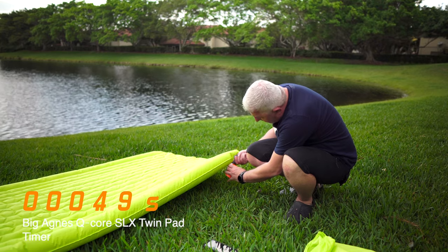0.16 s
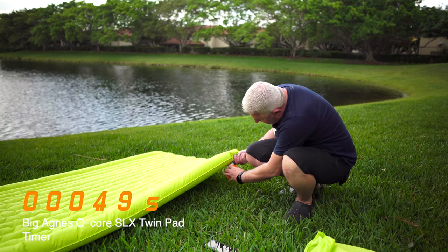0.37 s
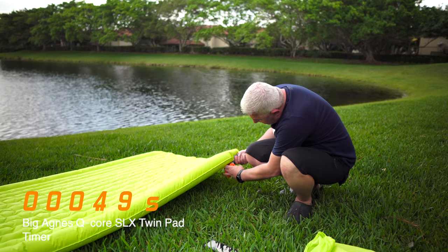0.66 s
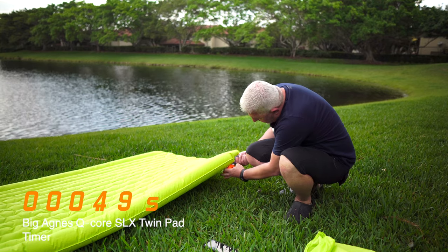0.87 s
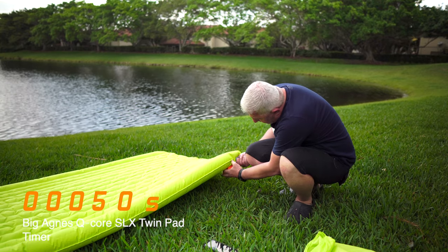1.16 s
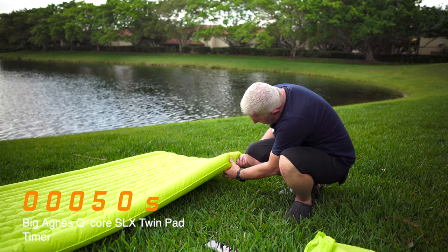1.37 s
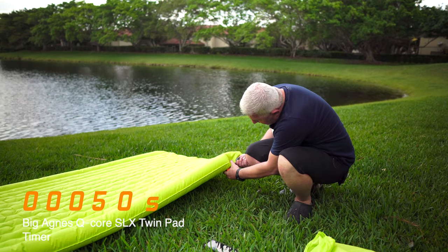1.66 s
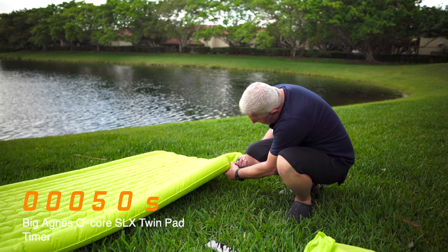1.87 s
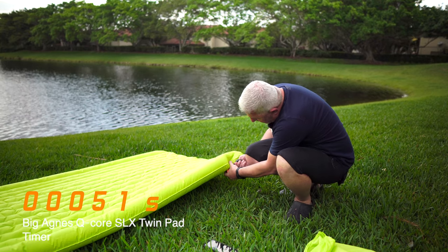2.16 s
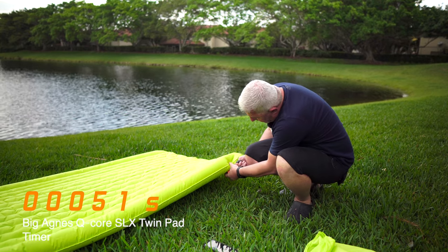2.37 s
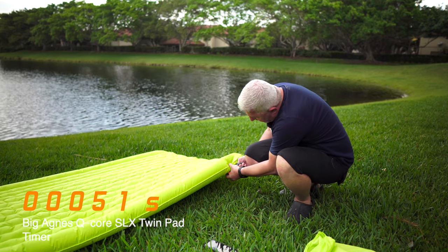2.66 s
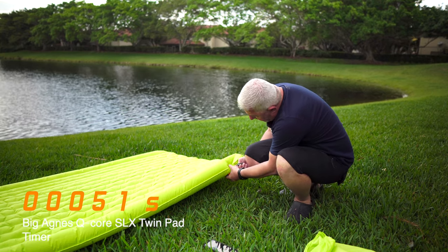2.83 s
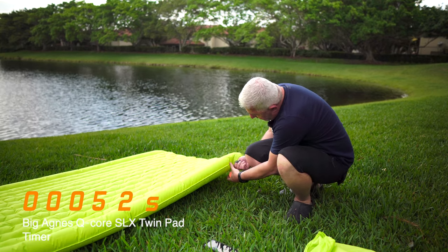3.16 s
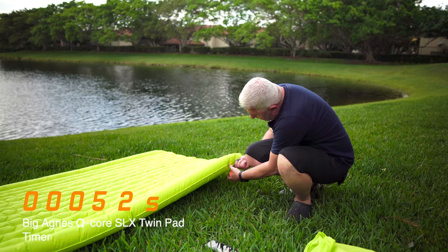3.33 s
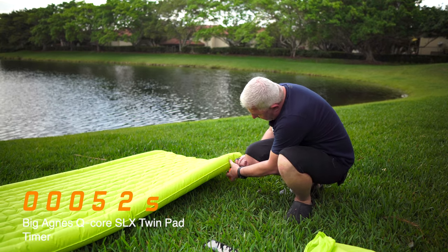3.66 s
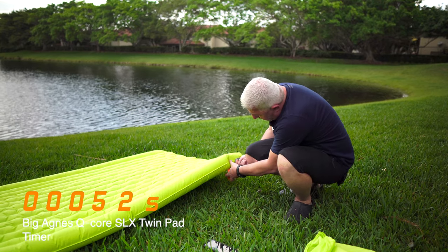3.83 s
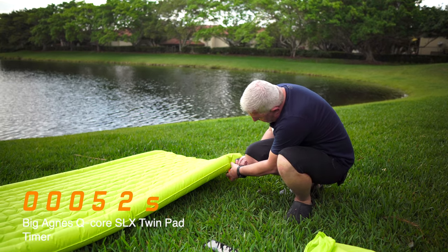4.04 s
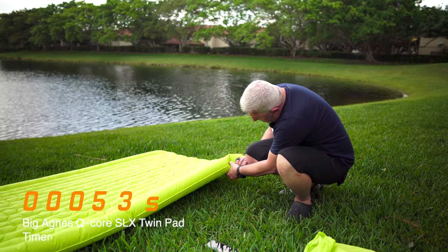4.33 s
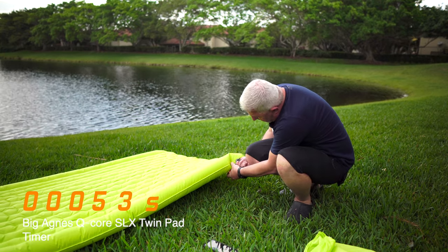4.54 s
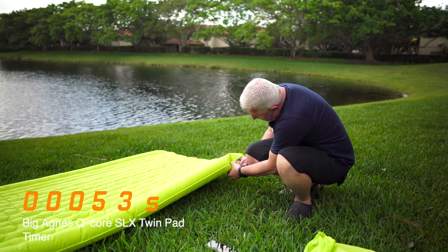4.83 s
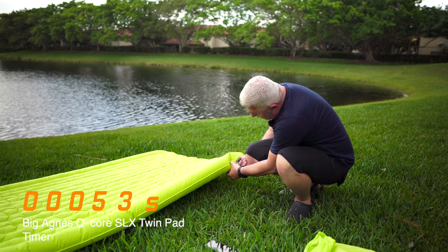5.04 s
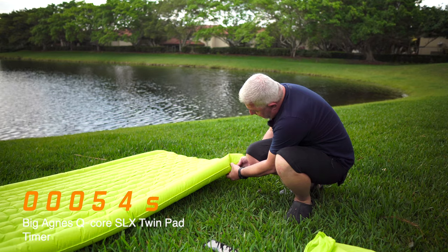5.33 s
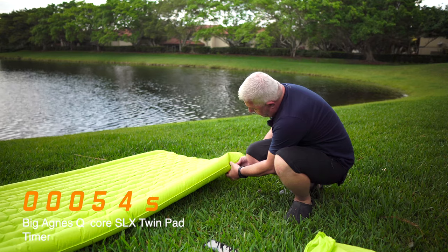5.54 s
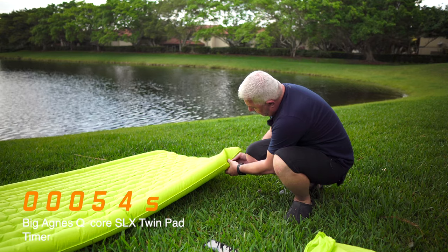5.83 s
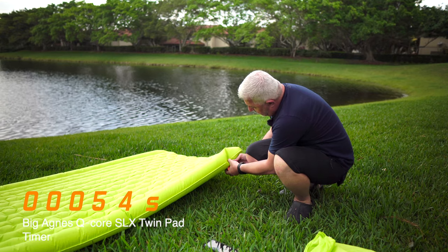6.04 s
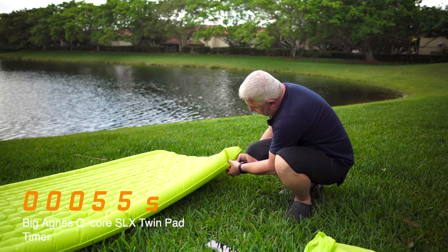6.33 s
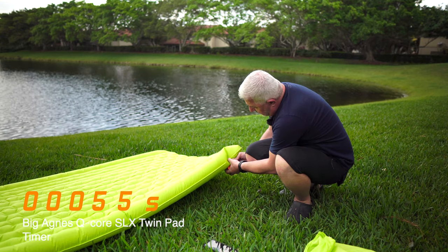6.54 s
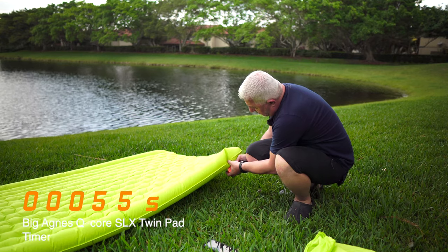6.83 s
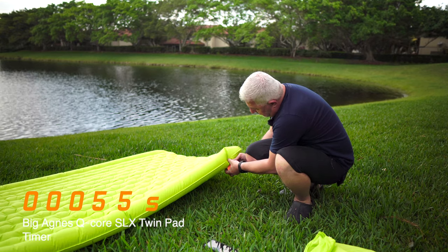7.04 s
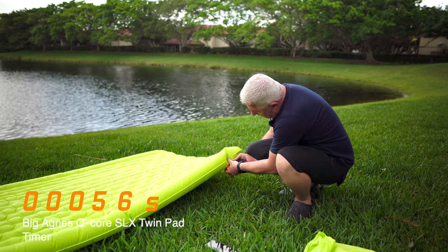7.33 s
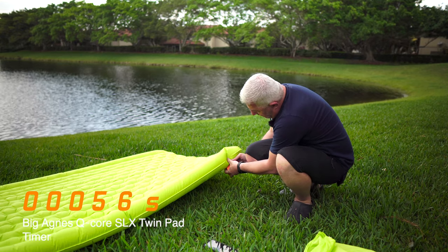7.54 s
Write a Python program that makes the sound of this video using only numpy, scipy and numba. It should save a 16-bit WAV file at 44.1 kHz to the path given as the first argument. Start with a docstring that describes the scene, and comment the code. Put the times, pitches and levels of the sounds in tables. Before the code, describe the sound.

A small battery air pump whines without pause, close to the microphone, on a lawn. From 0 to 1 s the whine sits near 2.95 kHz, bright and unsteady, with strong air roar and hiss. Around 1 s it rises to about 3.1 kHz and the roar steadies. At 2.03 s a blunt valve pop and tick land and the air thins; a stronger pop hits at 2.88 s as the pitch briefly jumps. From 3.25 to 3.9 s the whine dips, brighter and hissier. A sharp plastic click with a pop comes at 4.42 s, a duller knock at 4.59 s. Air swells near 5.4 s, then a crisp pop at 6.01 s. At 6.5 s another hard pop brings a short 1.1 kHz whistle; the motor climbs toward 3.45 kHz, and breathy whistling returns from 7.05 s to the end at about 7.7 s. Faint rumble, hum and wind puffs remain low.

```python
"""A small battery pump whines: an eight-blade impeller gives blade harmonics whose pitch lags each new load.
It is held against the valve of an air pad on a lawn and runs faster when the outlet is blocked.
Air roars in the nozzle and hisses past the fingers as filtered noise; the nearly shut outlet whistles.
The valve flap pops as damped pressure pulses and the nozzle ticks on the rim as short ringing modes.
Far off lie a soft rumble and a mains hum, with puffs of wind on the one close microphone."""
import sys
import numpy as np
from scipy import signal
from scipy.fft import rfft, irfft, next_fast_len
from scipy.io import wavfile
from scipy.ndimage import uniform_filter1d
from numba import njit

SR = 44100
rng = np.random.default_rng(int(sys.argv[2]) if len(sys.argv) > 2 else 0)


def voltage_ratio(level):
    """Linear amplitude factor for a level in decibels (scalar or array-like)."""
    return 10 ** (np.asarray(level, float) / 20)


def to_wav(s):
    """Save 16-bit WAV."""
    ch = np.atleast_2d(s).T  # columns
    pcm = np.round(np.clip(ch, -1, 1) * 32767)  # PCM
    wavfile.write(sys.argv[1], SR, pcm.astype(np.int16))


N = 339129
TIME = np.arange(N) / SR  # [s]


def level(x):
    """Normalisation of signal power: scales to rms 1."""
    return x / np.sqrt(np.mean(x ** 2))


def columns(table):
    """Linear interpolation in time: each column after the first as a value per sample."""
    s, *cols = np.transpose(table)
    return [np.interp(TIME, s, c) for c in cols]


def walk(rate):
    """Band-limited random modulation: levels held 1 / rate s and slewed twice; spread near 1."""
    hold_ms = int(1000 / rate)
    steps = np.repeat(rng.standard_normal(int(TIME[-1] * 1000) // hold_ms + 2), hold_ms)
    slow = 1.483 * uniform_filter1d(uniform_filter1d(steps, hold_ms), hold_ms)
    return np.interp(TIME, np.arange(len(slow)) / 1000, slow)


def tone(hz):
    """Frequency modulation: a sine of rms 1 whose phase is the integral of a moving pitch."""
    return np.sqrt(2) * np.sin(2 * np.pi * (np.cumsum(hz) / SR + rng.random()))


def colour_db(points, hz):
    """Spectral density at hz, interpolated in dB over logarithmic frequency."""
    f, db = np.transpose(points)
    return np.interp(np.log(hz), np.log(f), db)


def bands(points, centres):
    """Filter-bank analysis: coloured noise of rms 1 cut into overlapping bands that sum to the whole."""
    size = 2 * next_fast_len(N // 2 + 1)
    hz = np.arange(1, size // 2 + 2) * SR / size
    spectrum = rfft(rng.standard_normal(size)) * voltage_ratio(colour_db(points, hz))
    spectrum /= np.sqrt(np.mean(irfft(spectrum) ** 2))
    for row in np.eye(len(centres)):
        triangle = np.interp(np.log(hz), np.log(centres), row)
        yield irfft(spectrum * triangle)[:N]


@njit
def resonance(x, hz, width):
    """Second-order resonance: a state-variable band-pass with a moving centre and a width in Hz."""
    y, band, low = np.empty(len(x)), 0., 0.
    for i in range(len(x)):
        g, damping = np.tan(np.pi * hz[i] / SR), width / hz[i]
        v = (band + g * (x[i] - low)) / (1 + g * (g + damping))
        band, low, y[i] = 2 * v - band, low + 2 * g * v, damping * v
    return y


def add(out, s, sound):
    """Linear superposition: mixes a short sound in at a time s."""
    i = int(s * SR)
    out[i:i + len(sound)] += sound[:N - i]


def blade_rate():
    """Rotor inertia: two first-order lags between load and speed, with a small random waver; in Hz."""
    # each change of grip sets a new load; the tighter the outlet is shut, the faster the impeller:
    # (time [s], blade rate it settles to [Hz])
    load = [(0.0, 2941), (0.237, 2972), (0.347, 2900), (0.464, 2952), (0.686, 2974), (0.894, 2990),
            (0.969, 3118), (1.514, 3110), (1.993, 3230), (2.191, 3104), (2.368, 3140), (2.658, 3184),
            (2.858, 3404), (2.963, 3163), (3.114, 3170), (3.246, 2917), (3.359, 2990), (3.41, 2927),
            (3.554, 3033), (3.668, 3136), (3.794, 2986), (3.964, 2983), (4.157, 3120), (4.387, 3236),
            (4.539, 3110), (4.764, 3116), (5.186, 3125), (5.462, 3060), (5.61, 3127), (5.756, 3158),
            (5.854, 3310), (5.942, 3140), (6.163, 3150), (6.478, 3450), (6.599, 3520), (6.644, 3410),
            (6.753, 3274), (6.904, 3310), (7.083, 3413), (7.205, 3439), (7.496, 3467)]
    inertia_s = .0324  # time constant of each lag
    s, settle_hz = np.transpose(load)
    target = settle_hz[np.maximum(np.searchsorted(s, TIME) - 1, 0)] - settle_hz[0]
    keep = np.exp(-1 / (inertia_s * SR))
    once = signal.lfilter([1 - keep], [1, -keep], target)
    hz = signal.lfilter([1 - keep], [1, -keep], once) + settle_hz[0]
    return hz * (1 + .0006 * walk(40) + .0005 * walk(8))


def rotor():
    """Blade-passing tones: harmonics and shaft orders, each wavering in level in the turbulent inflow."""
    # blade tone and its harmonics, each shaded in its own way as hands and pump move:
    # (time [s], mean level [dB])
    blade_db = [(0.0, -23), (0.28, -33.5), (0.42, -23.5), (0.45, -29), (0.475, -43), (0.52, -32.5),
                (0.78, -28.0), (0.94, -33), (0.98, -41), (1.02, -32.5), (1.15, -31.5), (2.01, -30.5),
                (2.13, -40.5), (2.49, -29.5), (2.7, -39), (2.85, -58), (2.88, -45), (2.95, -40.0),
                (3.01, -47), (3.2, -50), (3.27, -23.5), (3.39, -39), (3.56, -39.5), (3.83, -31.5),
                (3.9, -37), (3.94, -47.0), (3.98, -35.0), (4.14, -40.5), (4.36, -32.0), (4.44, -42),
                (4.48, -40), (4.52, -41), (4.57, -47), (4.63, -36), (5.28, -37), (5.36, -23), (5.47, -22),
                (5.56, -26.5), (5.62, -22), (5.93, -31.5), (6.29, -24), (6.6, -38.5), (6.69, -30),
                (6.77, -33), (6.81, -45), (6.88, -37), (7.24, -35.0), (7.54, -43.5), (7.69, -32.5)]
    second_db = [(0.0, -32), (0.07, -28), (0.095, -39), (0.13, -17), (0.36, -18.5), (0.5, -35), (0.58, -21),
                 (0.64, -21.5), (0.73, -27), (0.8, -45), (0.86, -42), (0.92, -41), (1.14, -34.5),
                 (1.65, -35), (2.0, -33.5), (2.1, -45), (2.13, -58), (2.19, -39), (2.28, -35), (2.61, -34),
                 (2.86, -51), (2.99, -42), (3.03, -46), (3.22, -42.0), (3.33, -22.5), (3.47, -40),
                 (3.56, -26.0), (3.74, -44.0), (3.87, -33), (4.38, -31.5), (4.67, -39.5), (5.34, -33.5),
                 (5.57, -41.5), (5.74, -32), (5.93, -39), (5.98, -43), (6.05, -35), (6.12, -37),
                 (6.21, -31.5), (6.48, -38.5), (6.54, -50), (6.61, -37.0), (6.84, -42.0), (6.89, -50.0),
                 (6.98, -38), (7.23, -38.5), (7.5, -47), (7.56, -58), (7.62, -47), (7.69, -58.5)]
    third_db = [(0.0, -38), (0.12, -40), (0.23, -47), (0.3, -29.5), (0.67, -37.0), (0.72, -35),
                (0.96, -25.5), (1.08, -39.5), (1.65, -37), (2.19, -43.5), (2.32, -40), (2.86, -53),
                (3.01, -41), (3.24, -44), (3.31, -17.0), (3.35, -34), (3.41, -23.5), (3.51, -44),
                (3.67, -21.5), (3.75, -42), (3.87, -30), (4.02, -49), (4.28, -36), (4.4, -43), (4.49, -56),
                (4.57, -41), (5.08, -36.5), (5.2, -47.0), (5.29, -39), (5.53, -50.0), (5.65, -46),
                (5.73, -55.0), (5.77, -46), (5.89, -55.5), (6.06, -40.5), (6.27, -50), (6.48, -39),
                (6.53, -55.0), (6.59, -44.0), (6.7, -50), (6.87, -38.5), (7.04, -44.5), (7.14, -60.5),
                (7.29, -59), (7.61, -65), (7.69, -66)]
    fourth_db = [(0.0, -44.0), (0.33, -47.0), (0.42, -61), (0.46, -60), (0.86, -38.5), (1.09, -64.0),
                 (1.19, -55), (1.29, -62), (1.47, -49.0), (2.57, -55.0), (2.81, -67.5), (2.97, -56),
                 (3.24, -51.0), (3.42, -34), (3.5, -45), (3.62, -34), (3.77, -50.5), (4.13, -38),
                 (4.31, -62.0), (4.55, -45), (4.64, -60.0), (5.47, -59.0), (5.59, -53.0), (6.27, -64),
                 (6.48, -43), (6.52, -65.0), (6.6, -55), (6.9, -68), (7.18, -47), (7.69, -67)]
    fifth_db = [(0.0, -56), (0.21, -38), (0.68, -51.0), (0.74, -46.0), (1.01, -57.0), (1.21, -41),
                (1.4, -55), (2.02, -46), (2.07, -66), (2.23, -63.0), (2.29, -39.0), (2.34, -47),
                (2.58, -54), (3.24, -63.0), (3.38, -41), (4.05, -61), (4.38, -43), (4.46, -63.0),
                (4.77, -44.0), (4.91, -63), (5.76, -57.0), (5.85, -44.0), (5.91, -58.0), (7.69, -62.0)]
    # sidebands five shaft orders above blade harmonics: (multiple of shaft rate [-], mean level [dB])
    shaft = [(21, -60), (29, -59)]
    # unbalance tone while the housing presses on the valve, over its idle level:
    # (start [s], length [s], level [dB])
    presses = [(2.04, 0.34, -45), (2.36, 0.49, -37.5)]
    idle_db, fade_s = -50, 0.087

    hz = blade_rate()
    shaft_hz = hz / 8
    out = np.zeros(N)
    waver_dbs = 1.6, 1.9, 2.2, 3.2, 3.5
    tables = blade_db, second_db, third_db, fourth_db, fifth_db
    for k, table, waver_db in zip(range(1, 6), tables, waver_dbs):
        db, = columns(table)
        out += voltage_ratio(db + waver_db * walk(22)) * tone(k * hz)
    for k, db in shaft:
        out += voltage_ratio(db + 4 * walk(5)) * tone(k * shaft_hz)
    unbalance = voltage_ratio(idle_db)
    for s, length, db in presses:
        ramp = np.minimum(TIME - s, s + length - TIME) / fade_s
        unbalance = unbalance + voltage_ratio(db) * np.clip(ramp, 0, 1)
    return out + unbalance * voltage_ratio(1.5 * walk(12)) * tone(shaft_hz)


def air_levels():
    """Flow-controlled noise power: dB of roar, its low and upper part, leak, fine and top hiss, two flanks."""
    # air through the nozzle: (time [s], roar level [dB], its upper part against the roar [dB])
    flow = [(0.0, -25.5, 1.5), (0.16, -20.5, -1), (0.47, -22, 1.5), (0.56, -17, -7), (0.7, -20.5, -2.5),
            (0.97, -18.5, -4), (1.04, -21.5, -5), (1.27, -19, -3.5), (1.92, -23, 0.5), (2.07, -29.5, 1.5),
            (2.18, -26, -3.0), (2.25, -25.5, 0), (2.61, -23, -1), (2.84, -35, 3), (3.02, -25.0, -0.5),
            (3.2, -28.5, -0.5), (3.32, -21.5, 3), (3.38, -25, 5), (3.5, -21, -1.5), (3.6, -21, 5),
            (3.72, -28, 4), (3.93, -24.5, 0.5), (4.07, -26.5, 5.5), (4.24, -25.5, -2), (4.33, -31.0, 0.5),
            (4.69, -26.5, -3.5), (5.03, -27.0, -3), (5.08, -25, -3.0), (5.17, -28.5, -1.0),
            (5.39, -20.5, -3.0), (5.93, -25.5, -10), (6.03, -19.5, -9), (6.13, -28, -7.0),
            (6.29, -21.5, -10), (6.41, -25, -6), (6.52, -26, -9), (6.68, -29, -8.5), (6.89, -23.5, -3),
            (7.0, -26, -8), (7.14, -30.0, -8), (7.3, -26, -10.5), (7.69, -27, -9.5)]
    # low part of the roar: (time [s], level [dB])
    low_part = [(0.0, -31.5), (0.63, -27.5), (2.01, -31.0), (2.59, -28.5), (2.9, -32.0), (3.83, -33.5),
                (3.92, -29), (4.52, -32.5), (5.45, -29), (6.56, -33), (6.97, -35.5), (7.69, -33.5)]
    # hiss leaking past the fingers: (time [s], level [dB])
    leak_part = [(0.0, -31), (0.16, -32.5), (0.25, -35), (0.36, -32), (0.42, -28), (0.49, -37.5),
                 (0.62, -30), (0.79, -30.5), (0.91, -24), (0.95, -29), (0.99, -40), (1.1, -40.5),
                 (1.77, -37.5), (1.94, -36), (2.02, -36), (2.57, -32.5), (2.82, -44), (2.92, -41),
                 (3.21, -40), (3.25, -41), (3.32, -31), (3.44, -36.5), (3.64, -31), (3.72, -37),
                 (3.95, -36.5), (4.06, -32.5), (4.32, -40.5), (4.66, -37.5), (5.34, -35.5), (5.54, -41),
                 (5.79, -37), (5.87, -40), (6.14, -42), (6.55, -40.5), (6.73, -47), (6.91, -39),
                 (7.14, -44), (7.69, -43)]
    # treble: (time [s], fine hiss level [dB], top hiss level [dB])
    treble = [(0.0, -46, -39.5), (0.1, -43, -42), (0.14, -37, -42), (0.4, -36.5, -42), (0.57, -44.5, -41),
              (0.95, -39.5, -41), (1.0, -53, -45), (1.1, -52, -43), (1.25, -48, -38), (1.5, -52, -45),
              (1.91, -48, -42), (2.2, -49, -42.0), (2.65, -50.0, -44.5), (2.83, -51.5, -56),
              (2.95, -39, -40), (3.08, -50, -47), (3.24, -44, -49), (3.29, -36, -41), (3.37, -32, -47),
              (3.46, -38.5, -44), (3.76, -37, -45), (3.9, -47, -41), (4.11, -48, -47), (4.32, -48.5, -47),
              (4.54, -47, -41), (4.65, -53, -45), (5.31, -47.0, -48), (5.51, -45.5, -42), (5.79, -52, -50),
              (5.91, -43, -42.0), (5.97, -39, -45), (6.13, -51, -46), (6.48, -46.5, -51),
              (6.54, -40, -47.5), (6.73, -49, -49), (6.94, -44, -42.0), (7.14, -45, -51.5),
              (7.69, -43.5, -54)]
    # hiss around the leak: (time [s], level just under the blade tone [dB], level above the leak [dB])
    flanks = [(0.0, -40, -42), (0.22, -41, -32), (0.5, -38, -37.5), (0.64, -36, -29), (0.95, -42, -39),
              (0.99, -40, -44), (1.1, -40, -51), (1.3, -34, -41), (1.64, -37.5, -46), (1.78, -34, -34),
              (2.06, -42, -42.0), (2.6, -38, -45), (2.87, -46, -52), (2.94, -38, -57), (3.02, -45, -46.5),
              (3.21, -46, -56), (3.25, -44, -44), (3.33, -44, -39), (3.64, -44, -41.5), (3.7, -41, -40),
              (4.11, -37.5, -37), (4.65, -43, -43), (5.22, -47.5, -44.5), (5.41, -44, -50),
              (5.89, -46, -50), (6.49, -39.5, -47), (6.66, -42.5, -53.5), (6.85, -39.5, -47.0),
              (7.28, -46, -54.5), (7.38, -45, -55), (7.69, -44, -53.5)]
    roar, upper = columns(flow)
    return np.array([roar, *columns(low_part), roar + upper, *columns(leak_part),
                     *columns(treble), *columns(flanks)])


def air():
    """Turbulent flow noise shaped by resonances; hands open and cover the paths, and every band flickers."""
    # gap between nozzle and fingers: (time [s], resonance [Hz], share of the leak hiss [dB])
    gap = [(0, 3530, 0), (.16, 3540, 2), (.25, 3700, -19), (.36, 3720, -5), (.42, 3655, 3.5),
           (.63, 3750, 1), (.79, 3650, -2), (.96, 3760, -4), (.99, 4320, -14), (1.7, 4870, -12),
           (2.1, 4245, -7.5), (2.4, 4250, -2), (2.9, 4513, 5.5), (3.2, 4375, -16), (3.55, 4170, -6),
           (4.06, 3700, -6), (4.5, 4000, -9), (5.3, 4184, -7), (5.5, 3680, -12), (6, 3823, -9),
           (7.69, 3590, 1)]
    # pipe resonance of the nozzle: (mean centre [Hz], width [Hz], level against the roar [dB])
    nozzle = (1267, 118, -4)
    # broadband spectrum of the flow: (frequency [Hz], relative density [dB per Hz])
    air_colour = [(210, -21.5), (350, -10), (547, -11.5), (882, -3), (1250, 1), (1400, -1), (1750, -1.5),
                  (1960, -7), (2130, -18.5), (2450, -18), (2870, -22.5), (3200, -16.5), (3700, -17),
                  (5150, -22.5), (5870, -27.5), (7600, -25.5), (9500, -27.5), (11300, -27.5),
                  (15000, -30.5), (15800, -31)]
    # where each row of air_levels() acts, in the same order: (centre [Hz])
    air_centres = [1250, 700, 1700, 4000, 7800, 12000, 2400, 5150]

    dbs = air_levels()
    gap_hz, gap_db = columns(gap)
    leak = resonance(resonance(rng.standard_normal(N), gap_hz, 650.0), gap_hz, 650.0)
    out = level(leak) * voltage_ratio(dbs[3] + gap_db + 1.5 * walk(20))
    pipe_hz = nozzle[0] * (1 + 0.021 * walk(4.07))
    pipe = resonance(rng.standard_normal(N), pipe_hz, nozzle[1])
    out += level(pipe) * voltage_ratio(dbs[0] + nozzle[2])

    dbs -= dbs.mean(axis=1, keepdims=True)  # the broadband part follows only departures from the mean
    order = np.argsort(air_centres)
    at = np.log(np.array(air_centres)[order])
    centres = 350 * 2 ** np.arange(0, 5.6, 1 / 6)
    gust_db, flutter_db = 0.74 * walk(14), 0.81 * walk(18)
    for hz, band in zip(centres, bands(air_colour, centres)):
        share = np.array([np.interp(np.log(hz), at, row) for row in np.eye(len(at))])
        # each band drifts slowly at random, most in the treble, which also flutters as one
        drift_db = min(hz / 3000, 1) * (1.5 * walk(4) + flutter_db)
        flicker_db = 1.36 * walk(12) + 1.12 * walk(60)
        out += band * voltage_ratio(-21.5 + share @ dbs[order] + gust_db + drift_db + flicker_db)
    return out


def whistle():
    """Aerodynamic whistling of the stalled nozzle: a breathy, unsteady tone while the outlet is nearly shut."""
    # one list for each whistle: (time [s], mean pitch [Hz], mean level [dB])
    passages = [
        [(6.49, 1095, -34), (6.51, 1104, -29), (6.594, 1130, -21), (6.63, 1173, -23.5), (6.684, 1130, -20),
         (6.73, 1080, -36)],
        [(7.05, 1060, -38), (7.1, 1082, -31), (7.24, 1130, -22.5), (7.34, 1107, -23.5), (7.39, 1122, -26),
         (7.42, 1094, -24), (7.46, 1115, -32), (7.526, 1115, -21), (7.585, 1110, -24.5), (7.61, 1130, -21.5),
         (7.69, 1134, -21)],
    ]
    out = np.zeros(N)
    for table in passages:
        hz, db = columns(table)
        on = (TIME > table[0][0]) & (TIME < table[-1][0])
        out += on * voltage_ratio(db + 1.8 * walk(40)) * tone(hz * (1 + .007 * walk(70)))
    return out


def pops():
    """Damped free oscillation: the flap bulges, snaps back with a suction peak, overshoots, then rattles."""
    # valve pops: (time [s], pulse level [dB], pitch [Hz], rattle level against the pulse [dB])
    snaps = [(1.9759, -18, 453, -6), (2.0286, -3, 430, -32), (2.033, -12, 397, -9), (2.2237, -16, 480, -1),
             (2.6239, -16, 273, -36), (2.8819, 1, 286, -35), (2.976, -15, 400, -13),
             (2.9797, -23, 330, -12), (2.983, -16, 400, -9), (3.029, -17.5, 604, -5.5),
             (3.2619, -21.5, 225, -20), (3.463, -15, 432, -18), (4.4153, -5.5, 402, -13.5),
             (4.428, -16, 306, -20), (4.59, -13.5, 568, -7), (5.8862, -23, 435, -28),
             (6.0124, -4, 544, -10.5), (6.0185, -12.5, 430, -24), (6.4591, -21, 207, -6),
             (6.4958, -1.5, 345, -15), (6.773, -16.5, 480, -5.5), (6.784, -19, 520, -12)]
    out, t = np.zeros(N), np.arange(-.01, .05, 1 / SR)
    dull = signal.butter(3, [120, 1100], "bandpass", fs=SR, output="sos")
    for s, db, hz, rattle_db in snaps:
        cycles = t * hz
        spread = np.where(cycles < .25, 0.55, .5)
        fade = np.exp(-((cycles - .25) / spread) ** 2)
        point = 0.27 * np.exp(-np.abs(cycles - .05) / 0.12)
        swing = np.cos(2 * np.pi * cycles) + 0.26 * np.cos(2 * np.pi * 2.77 * (cycles - .05))
        noise = level(signal.sosfilt(dull, rng.standard_normal(len(t))))
        rattle = voltage_ratio(rattle_db) * noise * (t > 0) * np.exp(-np.abs(t) / 0.014)
        add(out, s + t[0], voltage_ratio(db) * (rattle - point - fade * swing))
    return out


def ticks():
    """Modal excitation by hard plastic contact: a crack and rim modes; where it lands decides which ring."""
    # nozzle on valve rim: (time [s], level before a common 8.5 dB cut [dB], favoured frequency [Hz],
    # spread [octaves])
    contacts = [(2.0285, -11, 1500, 1.4), (2.8798, -6, 1300, 1.3), (4.415, 2, 4000, 0.76),
                (4.592, -6, 960, .8), (6.0123, -2.5, 5010, 3.8), (6.015, -15, 7000, 2.5),
                (6.4968, -13, 2400, .7)]
    # modes of the rim: (frequency [Hz], relative level [dB], 60 dB decay time [s])
    rim = [(914, 4.5, 0.033), (2450, -3, 0.018), (4000, -5, 0.011), (7000, -1, .007), (10860, 5, 0.0057)]
    out, t = np.zeros(N), np.arange(0, .03, 1 / SR)
    for s, db, near_hz, spread in contacts:
        chance = rng.standard_normal(len(t))
        ring = 0
        for (hz, mode_db, t60), g in zip(rim, chance):
            distance = np.log2(hz / near_hz) / spread
            mode = np.sin(2 * np.pi * hz * t) * 1000. ** (-t / t60)
            ring = ring + voltage_ratio(mode_db - 25 * distance ** 2 + 0.5 * g) * mode
        # the crack weakens as the favoured frequency departs from 11 kHz
        crack_db = -12 * (np.log2(11000 / near_hz) / spread) ** 2
        crack = voltage_ratio(crack_db) * .9 * chance * np.exp(-t / .0015)
        add(out, s, voltage_ratio(db - 8.5) * (ring + crack))
    return out


def lawn():
    """Low-frequency ambient noise: slow distant rumble, the pad booming with the inflow, wind, wavering hum."""
    # rumble and boom spectrum: (frequency [Hz], relative density [dB per Hz])
    ground_colour = [(12, -42), (20, -23), (107, 3), (201, -1.5), (397, -3), (528, -16), (600, -8),
                     (780, 8.5), (1320, -120)]
    ground_db = -39.5
    # wind on the microphone, over a calm level: (time of the peak [s], length [s], peak level [dB])
    gusts = [(1.75, .4, -52), (2.401, 0.46, -43), (6.046, .15, -56), (6.644, 0.34, -52), (7.6, 0.42, -47)]
    calm_db = -52
    # mains hum: (mean frequency [Hz], mean level [dB])
    mains = (119, -50.5)

    centres = 20 * 2 ** np.arange(0, 5.1, .5)
    inflow_db = air_levels()[1]
    inflow_db = 0.94 * (inflow_db - inflow_db.mean())
    ground = np.zeros(N)
    for hz, band in zip(centres, bands(ground_colour, centres)):
        # the higher the band, up to 250 Hz, the more it follows the inflow
        ground += band * voltage_ratio(2.7 * walk(2.36) + min(hz / 250, 1) * inflow_db)
    wind = resonance(rng.standard_normal(N), np.full(N, 52.), 30.)
    puffs = voltage_ratio(calm_db)
    for s, length, db in gusts:
        puffs = puffs + voltage_ratio(db) * np.exp(-(2 * (TIME - s) / length) ** 2)
    hum = voltage_ratio(mains[1] + 2.3 * walk(8.9)) * tone(mains[0] * (1 + 0.0251 * walk(9)))
    return voltage_ratio(ground_db) * ground + puffs * level(wind) + hum


def scene():
    """Superposition of all sources, the same in both channels."""
    return np.tile(rotor() + air() + whistle() + pops() + ticks() + lawn(), (2, 1))


def roll_off(x):
    """The treble ends steeply here."""
    return signal.sosfilt(signal.butter(12, 15910, fs=SR, output="sos"), x)


def record(dry):
    """Overload and band limiting: peaks clip at full scale, then an elliptic low-pass cuts the top."""
    top_hz = 15700
    low_pass = signal.ellip(8, .2, 70, top_hz, fs=SR, output="sos")  # ripple, stop-band depth [dB]
    mix = signal.sosfilt(low_pass, np.clip(dry, -1, 1))
    return roll_off(mix)


dry = scene()
out = record(dry)
to_wav(out)
```